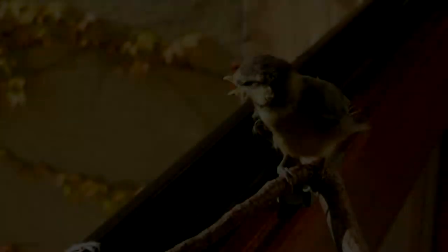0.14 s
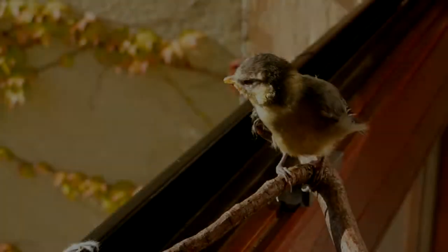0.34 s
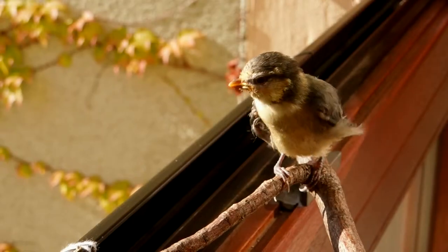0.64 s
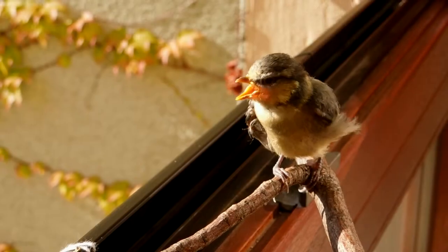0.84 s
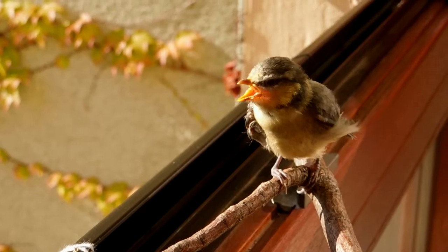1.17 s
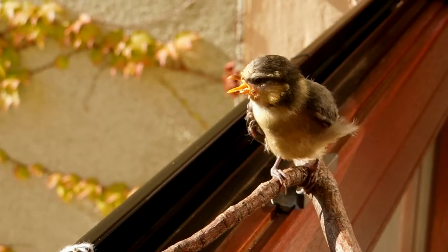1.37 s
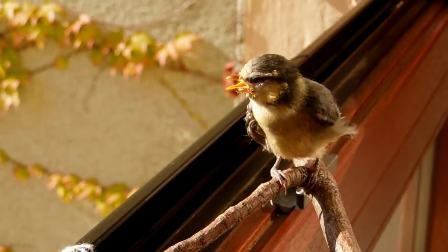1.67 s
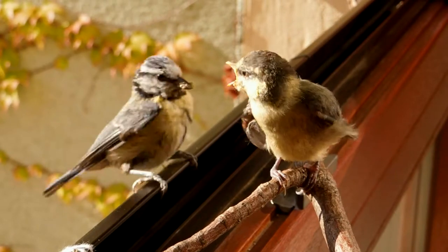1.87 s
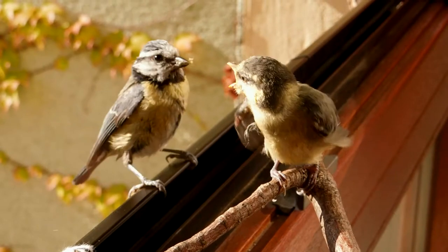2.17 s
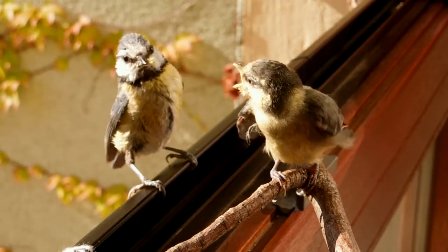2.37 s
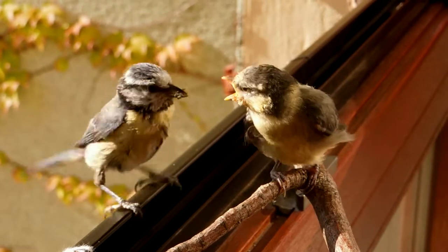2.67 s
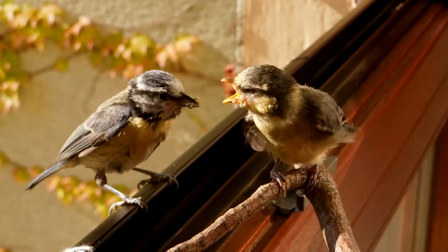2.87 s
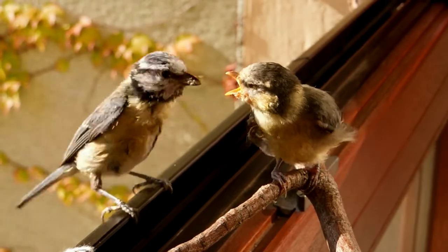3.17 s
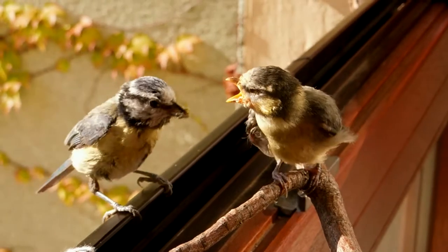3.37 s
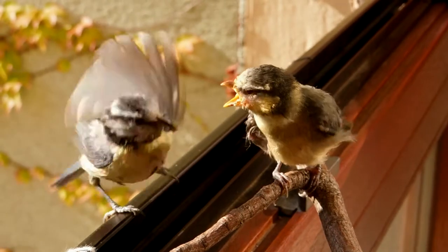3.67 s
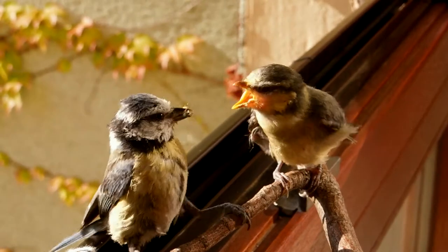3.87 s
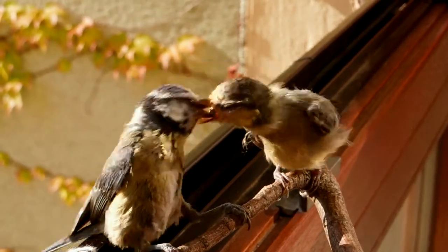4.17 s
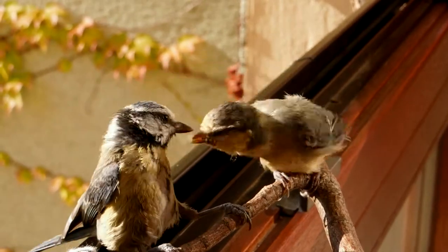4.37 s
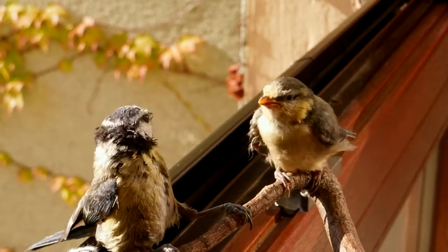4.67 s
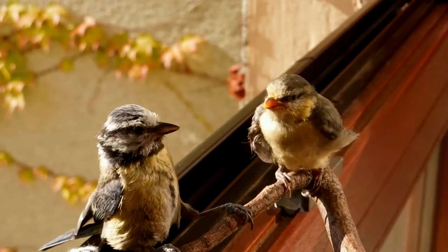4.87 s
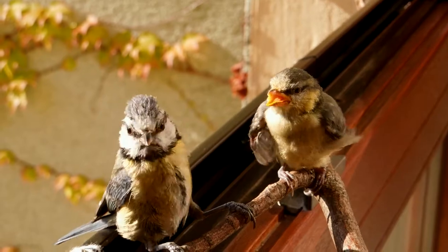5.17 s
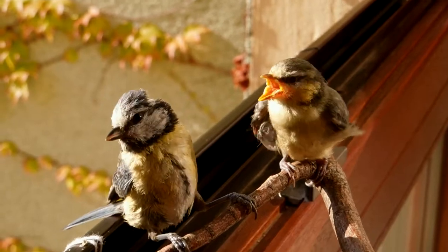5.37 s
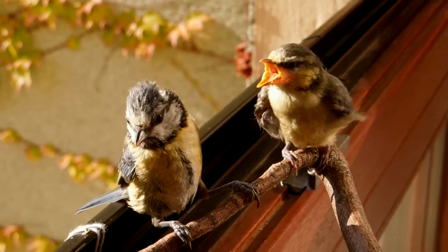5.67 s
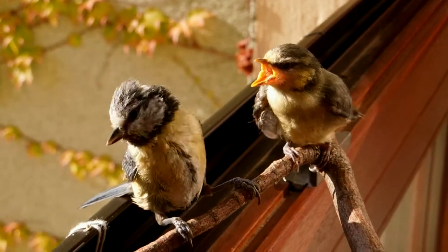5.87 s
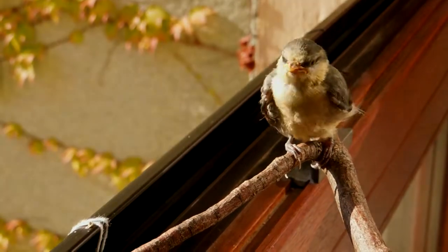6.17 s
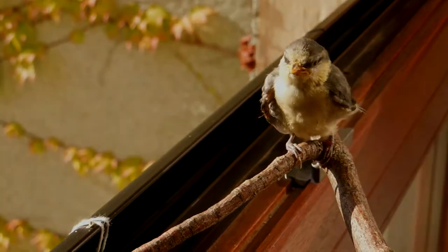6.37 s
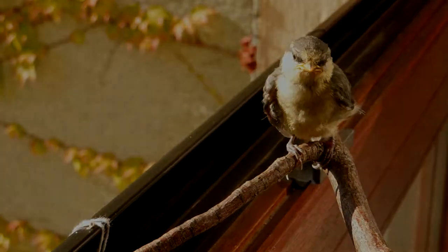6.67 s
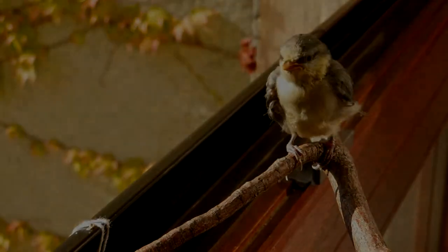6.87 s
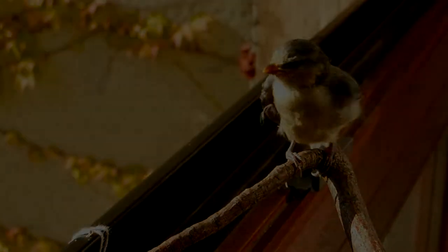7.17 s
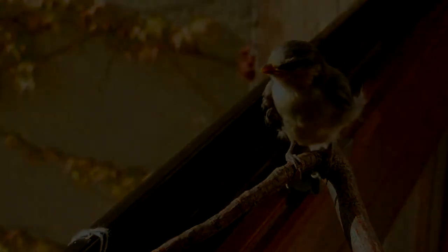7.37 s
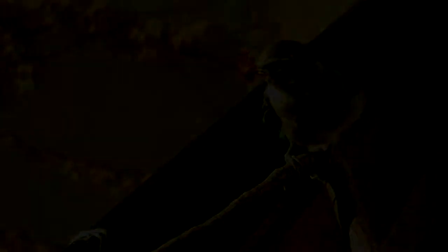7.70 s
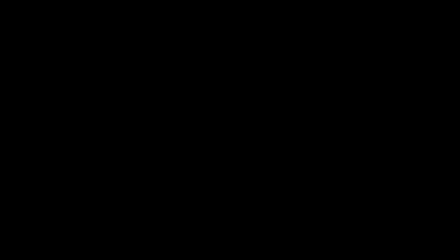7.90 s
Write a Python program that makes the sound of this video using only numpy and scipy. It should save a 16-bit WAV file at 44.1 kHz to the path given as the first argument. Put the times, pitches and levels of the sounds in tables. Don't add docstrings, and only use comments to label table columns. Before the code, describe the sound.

Bursts of raspy, very high chirps from a young bird outdoors, wing flaps and claw taps, faint peeps from another chick, soft traffic murmur behind.

```python
import sys
import numpy as np
from scipy import signal
from scipy.fft import rfft, irfft, next_fast_len
from scipy.io import wavfile
from scipy.ndimage import uniform_filter1d, map_coordinates

SR = 44100
rng = np.random.default_rng(int(sys.argv[2]) if len(sys.argv) > 2 else 0)


def to_wav(sig):
    pcm = np.clip(np.atleast_2d(sig), -1, 1) * 32767
    pcm = np.round(pcm).astype(np.int16)
    wavfile.write(sys.argv[1], SR, pcm.T)


def linear_from_db(decibels):
    return 10 ** (np.asarray(decibels, float) / 20)


N = 354563

# hz, density_db
RUMBLE_SPECTRUM = [(16, -32), (25, -5), (35, 6.5), (48, -4), (75, -2), (110, -8.5), (140, -9), (200, -5.5),
                   (300, -18.5), (600, -93.5)]
ROAD_SPECTRUM = [(88, -23), (150, -6.5), (315, -4.5), (456, -9), (531, -5), (584, -4.5), (1060, -3.5),
                 (1190, -7), (1530, -7), (2160, -12), (4000, -30), (5200, -50), (8800, -120)]
# time_s, level_db
TRAFFIC_SWELL = [(0, -0.5), (1, -0.5), (1.55, -4), (2.15, 1.5), (2.7, -3), (3.3, 1), (4.3, 0.7),
                 (5.5, -1.17), (6.4, -0.3), (6.9, -1.5), (7.6, -1)]
# hz, density_db
AIR_SPECTRUM = [(1470, -12), (2500, -4.5), (2820, -5), (3580, -6), (4860, -6.5), (5530, -9.5),
                (12700, -12.5), (14400, -21), (14800, -46), (15500, -60)]
# hz, likeness_0_to_1
STEREO_LIKENESS = [(60, 0.86), (150, 0.83), (380, 0.68), (950, 0.86), (2380, 0.66), (5980, 0.13),
                   (15000, 0.05)]
# time_s, peak_db
START_CLICKS = [
    (0.1493, -35.5),
    (0.16, -44),
]
# start_s, peak_db, gutter_ring_db, dull_knock_db
CLAW_TICKS = [(.38, -34, -23, -45), (.9862, -43, -38, -29.5), (2.0454, -23, -9, -29),
              (2.1504, -41.5, -26, -22), (2.9264, -33.5, -3.5, -34), (3.017, -34.5, 1.5, -22),
              (3.0455, -33.5, -4, -20), (3.255, -31, -9, -21), (5.338, -27, -35, -22),
              (6.0943, -29.5, -33, -32), (7.613, -38.5, -23, -15.5), (7.6484, -16, -34, -18)]
# hz, level_db, t60_s
GUTTER_MODES = [(2240, 1.5, 0.05), (2360, 4.5, 0.027)]
# start_s, length_s, top_hz, level_db, octave_db
PEEP_NOTES = [(.6, 0.065, 6740, -51, -45), (5.131, 0.049, 6160, -35.5, -30.5),
              (5.238, .069, 6000, -35.5, -30.5), (5.802, 0.053, 6320, -33, -32.5),
              (6.33, .06, 6000, -50, -45.5), (6.435, 0.053, 6023, -46.5, -45.5),
              (6.515, 0.053, 6300, -47.5, -45), (6.6, 0.053, 6020, -48, -48.5),
              (6.69, 0.066, 5600, -51, -52.5), (6.8, .068, 5590, -50, -55), (6.94, 0.064, 5530, -54, -58.5),
              (7.075, 0.075, 5530, -56.5, -57.5), (7.43, 0.093, 5940, -65.5, -67.5),
              (7.79, 0.057, 5800, -74, -75)]
# time_s, pitch_hz, level_db
ENGINE_TRACK = [(1.0, 67.1, -64.5), (1.61, 82.7, -63), (2.25, 77.4, -56.5), (3.36, 73.3, -55.5),
                (5.3, 62.5, -45.5), (5.65, 64.4, -42.5), (5.8, 76, -59.5), (6.04, 87.5, -60),
                (6.1, 85.1, -86)]
# start_s, length_s, throat_db,
# gape_over_throat_db, sizzle_over_throat_db
BREAKING_RASPS = [
    (.985, 0.055, -41.5, 7.5, -4),
    (1.097, 0.038, -45.5, 16.5, 4),
    (1.23, 0.042, -51, 15.5, 3),
    (2.306, 0.079, -29.5, 2.5, -4),
    (2.429, .045, -33.5, 8, -4.5),
    (2.55, 0.037, -34.5, 7, -3.5),
    (4.165, 0.075, -29, 2, -4),
    (4.291, 0.044, -34.5, 11.5, -1),
    (6.104, .056, -40, -5, 6),
    (6.233, .066, -30.5, -5, 4.5),
]
DYING_RASPS = [
    (1.4, 0.099, -39, 2.5, -10),
    (2.151, 0.11, -40.5, 1, -3),
    (2.69, .118, -31, 2, -10.5),
    (3.565, .06, -61.5, 13.5, -4),
    (4.043, 0.064, -34.5, 0, -3.5),
]
# hz, width_hz, level_db
THROAT_MODES = [(2220, 2300, -5), (3286, 1000, -1), (4700, 600, 5), (6000, 740, 1.5)]
GAPE_MODES = [(7370, 1300, 0)]
SIZZLE_MODES = [(10200, 1700, 3.5), (12160, 750, 7.5), (13660, 1800, 3.5)]
# start_s, length_s, upper_top_hz, upper_end_hz, level_db
WHISTLES = [
    (1.023, 0.029, 8830, 8450, -27),
    (1.11, 0.071, 8750, 8000, -20.5),
    (1.244, 0.099, 8280, 7310, -19),
    (2.363, 0.025, 7690, 7425, -16),
    (2.45, 0.06, 8140, 7470, -15),
    (2.57, .077, 7730, 7175, -14.5),
    (4.221, 0.022, 8010, 8070, -12.5),
    (4.31, 0.055, 7910, 7170, -14.5),
]
# times_upper_pitch, times_lower_pitch; then each one's level under_upper_db
MIXING_ORDERS = [(-1, 2), (2, -1), (0, 2), (1, 1), (2, 0)]
MIXING_LEVELS = [-33, -39, -34, -27, -31.5]
# start_s, length_s, hiss_db
WING_STROKES = [(1.354, 0.063, -51), (1.857, 0.058, -50.5), (1.919, 0.066, -44), (2.035, 0.054, -46),
                (2.9, .06, -53), (2.958, 0.079, -44), (3.016, 0.058, -51), (3.185, 0.053, -43.5),
                (3.231, 0.052, -39), (3.342, 0.047, -55.5), (3.446, 0.1, -42.5), (3.895, 0.11, -52.5),
                (3.994, 0.06, -46.5), (6.189, 0.044, -42), (6.298, 0.23, -50.5)]
# hz, density_db
FEATHER_SPECTRUM = [(1200, -61), (2500, -8.5), (5000, -12), (8000, -11.5), (10500, -5), (12700, -1),
                    (14400, -9), (15500, -44.5)]
# centre_s, half_length_s, level_db
LOW_THUMPS = [
    (2.88, .16, -43.5),
    (5.6, 0.21, -57),
    (6.27, 0.078, -42.5),
]
# time_s, level_db
SPARROW_TRACK = [
    (7.25, -68.5),
    (7.4, -62.5),
    (7.6, -63),
    (7.87, -70),
]
# hz, density_db
HEDGE_SPECTRUM = [(3300, -120), (3800, -14), (4300, -8), (4900, -11), (5400, -5), (6000, -28), (6600, -120)]
# time_s, wing_beat_hz, level_db
BEE_TRACK = [
    (7.3, 188, -78),
    (7.38, 190.4, -62),
    (7.48, 198, -61.5),
    (7.53, 204, -77),
]
BEE_HARMONICS = [3.5, 1.5, -1.5, 1, -13, -18, -2]
# delay_s, left_db, right_db
WALL_ECHOES = [(.0031, -5.5, -28), (.0083, -8.5, -14.5), (0.0109, -19.5, -35.5), (0.0227, -46.5, -55),
               (.034, -59, -33.5)]
# hz, t60_s
YARD_DECAY = [(300, 0.22), (4000, 0.15), (7500, 0.16), (13000, 0.14)]
# source_hz, lower_copy_db, upper_copy_db
GHOST_LEVELS = [(4000, -49.5, -52.5), (6800, -33, -37), (8000, -27, -32), (12000, -19, -33)]
# hz, level_db
MICROPHONE_RESPONSE = [(13500, 0.5), (14200, 2), (14700, -38.5), (15700, -37)]


def unit(x):
    return x / np.sqrt(np.mean(x ** 2) + 1e-20)


def along(points, hz):
    f, v = np.transpose(points)
    return np.interp(np.log(hz + 1), np.log(f + 1), v)


def curves(spans, edge=0.0055):
    t = np.arange(N) / SR
    gate = sum(np.clip(np.minimum(t - r[0][0], r[-1][0] - t) / edge + 1, 0, 1) for r in spans)
    s, *cols = np.concatenate(spans).T
    return [np.minimum(gate, 1)] + [np.interp(t, s, c) for c in cols]


def wobble(rate):
    knots = rng.standard_normal(int(N * rate / SR) + 4)
    return map_coordinates(knots, [np.arange(N) * rate / SR])


def turns(hz):
    return 2 * np.pi * np.cumsum(hz) / SR


def filtered(x, response):
    m = next_fast_len(N + 8192)
    return irfft(rfft(x, m) * response(np.fft.rfftfreq(m, 1 / SR)), m)[..., :N]


def resonant(x, peaks, waver_db):
    def band(centre, width):
        return filtered(x, lambda f: (1j * f * width / (centre ** 2 - f * f + 1j * f * width)) ** 2)
    return unit(sum(linear_from_db(db + waver_db * wobble(140)) * band(c, w) for c, w, db in peaks))


def rush(spectrum, patchy_db):
    z = signal.stft(rng.standard_normal((2, N)), nperseg=512)[2]
    field = uniform_filter1d(rng.standard_normal(z.shape[1:]), size=6, axis=0)
    field = uniform_filter1d(field, size=14, axis=1)
    pair = signal.istft(z * linear_from_db(patchy_db * unit(field)), nperseg=512)[1][:, :N]

    def response(hz):
        turn = np.arccos(np.clip(along(STEREO_LIKENESS, hz), -1, 1)) / 2
        return linear_from_db(along(spectrum, hz)) * [np.cos(turn), np.sin(turn)]
    mid, side = filtered(pair, response)
    return unit(np.array([mid + side, mid - side]))


def lay(events, shape, count):
    out = np.zeros((count, N))
    for s, length, *row in events:
        t = np.arange(round(length * SR)) / SR
        out[:, round(s * SR):][:, :len(t)] = shape(t, length, *row)
    return out


def background_fade():
    return np.interp(np.arange(N) / SR, [0.03, 2.31, 6.21, 8.19], [0, 1, 1, 0])


def traffic_swell():
    return background_fade() * linear_from_db(curves([TRAFFIC_SWELL])[1])


def traffic():
    rumble = background_fade() * linear_from_db(-49.5 + 0.72 * wobble(1.3)) * rush(RUMBLE_SPECTRUM, patchy_db=1.5)
    roar = traffic_swell() * linear_from_db(-47 + 0.65 * wobble(7.8)) * rush(ROAD_SPECTRUM, patchy_db=1.19)
    return rumble + roar


def air_hiss():
    return traffic_swell() ** 1.1 * linear_from_db(-54) * rush(AIR_SPECTRUM, patchy_db=2.0)


def start_clicks():
    t = np.arange(N) / SR

    def bump(s):
        return np.exp(-((t - s) / 8e-5) ** 2)
    return sum(linear_from_db(db) * (0.28 * bump(s + .0013) - bump(s)) for s, db in START_CLICKS)


def claw_ticks():
    out, t = np.zeros(N + SR), np.arange(SR // 8) / SR
    for s, db, ring_db, knock_db in CLAW_TICKS:
        noise = rng.standard_normal(len(t) + 1)
        decay = linear_from_db(-60 * t / .006) + .25 * linear_from_db(-60 * t / 0.02)
        crack = (noise[1:] - .7 * noise[:-1]) * decay
        dull = uniform_filter1d(noise[1:], size=5) - uniform_filter1d(noise[1:], size=24)
        knock = dull * linear_from_db(knock_db + 20.0 - 60 * t / 0.0096)
        ring = sum(linear_from_db(level - 60 * t / t60) * np.sin(2 * np.pi * hz * t) for hz, level, t60 in GUTTER_MODES)
        out[round(s * SR):][:len(t)] += linear_from_db(db - 4.0) * (crack + knock + linear_from_db(ring_db - 1.5) * ring)
    return out[:N]


def peep(t, length, top_hz, db, octave_db):
    u = t / length
    edge = np.clip(np.minimum(t, length - t) / .002, 0, 1)

    def hill(peak, rise_db, fall_db):
        return linear_from_db(-np.interp(u, [0, peak, 1], [np.sqrt(rise_db), 0, np.sqrt(fall_db)]) ** 2)
    soft_db, loud_db, end_hz = -56, -35, 4690
    effort = np.clip((db - soft_db) / (loud_db - soft_db), 0, 1)
    hold = effort * 0.011
    hz = top_hz - (top_hz - end_hz) * np.clip((t - hold) / (length - hold), 0, 1) ** 1.15
    hz = hz - effort * 347 * np.exp(-t / .004)
    hz = hz - 300.4 * u ** 6
    return hz, edge * linear_from_db(db) * hill(0.66, 14, 21), edge * linear_from_db(octave_db) * hill(0.39, 5.5, 29.5)


def peeps():
    hz, size, octave = lay(PEEP_NOTES, peep, count=3)
    phase = turns(hz + 70 * wobble(400))
    note = size * linear_from_db(5.0 + 4.9 * wobble(220)) * np.sin(phase)
    return np.sqrt(2) * (note + octave * linear_from_db(4 + 2.4 * wobble(220)) * np.sin(2 * phase))


def far_engine():
    gate, hz, db = curves([ENGINE_TRACK], edge=.2)
    return np.sqrt(2) * gate * linear_from_db(db + 1.5 * wobble(5.7)) * np.sin(turns(hz))


def rasps():
    t = np.arange(N) / SR
    effort, gape, sizzle = np.zeros((3, N))
    rate_hz = np.full(N, 1270.)
    calls = [(.72, *row) for row in BREAKING_RASPS] + [(.54, *row) for row in DYING_RASPS]
    for peak, s, length, db, gape_db, sizzle_db in calls:
        span = slice(round(s * SR), round((s + length) * SR))
        arch = np.sin(np.pi / 2 * np.interp(t[span] - s, [0, peak * length, length], [0, 1, 0]))
        snap = np.exp(-np.abs(t[span] - s) / 0.0019)
        effort[span] = linear_from_db(db) * (arch + .2 * snap)
        gape[span] = linear_from_db(gape_db) * (1 + 3.5 * snap)
        sizzle[span] = linear_from_db(sizzle_db)
        rate_hz[span] += 210 * arch ** 0.47
    phase = turns(rate_hz * (1 + 0.031 * wobble(120) + 0.077 * wobble(1300)))
    pulses = np.exp(12 * (np.cos(phase) - 1)) * linear_from_db(1.2 * wobble(700))
    sharp = unit(np.diff(pulses, 2, prepend=[0, 0]))
    source = linear_from_db(1.5 * wobble(300)) * (.85 * sharp + .5 * rng.standard_normal(N))
    throat = resonant(source, THROAT_MODES, 1.6)
    beak = gape * resonant(source, GAPE_MODES, 1.8)
    return effort * (throat + beak + sizzle * resonant(source, SIZZLE_MODES, 1.5))


def whistle(t, length, top_hz, end_hz, db):
    scoop_s = .016
    scoop = np.clip(1 - t / scoop_s, 0, 1) ** 1.5
    after = np.maximum(t - scoop_s, 0)
    sag_hz = (top_hz - end_hz) * (after / (length - scoop_s)) ** .85
    above_hz = top_hz - 8000
    attack_s, release_s = 0.015, 0.012
    swell = linear_from_db(db) * np.clip(np.minimum(t / attack_s, (length - t) / release_s), 0, 1) ** 0.69
    upper_hz = top_hz * (1 - 0.15 * scoop) - sag_hz
    lower_depth = 0.31 - 0.019 * above_hz / 100
    lower_hz = (6973 + .55 * above_hz) * (1 - lower_depth * scoop) - .75 * sag_hz
    lower_db = 0.45 * above_hz / 100 - 119.5 * after
    return upper_hz, swell, lower_hz, swell * linear_from_db(lower_db)


def duet():
    up_hz, up_size, low_hz, low_size = lay(WHISTLES, whistle, count=4)

    def beak(hz):
        return linear_from_db(-5 * ((hz - 7930) / 1105) ** 2)
    up_size, low_size = up_size * beak(up_hz), low_size * beak(low_hz)
    up = turns(up_hz + 40 * wobble(320))
    low = turns(low_hz + 40 * wobble(300))
    upper = up_size * linear_from_db(2.3 * wobble(210)) * np.sin(up)
    lower = low_size * linear_from_db(2.5 * wobble(110)) * np.sin(low)
    mixed = sum(linear_from_db(db + 8.7 * wobble(50)) * np.sin(a * up + b * low)
                for (a, b), db in zip(MIXING_ORDERS, MIXING_LEVELS))
    return np.sqrt(2) * (upper + lower + up_size * mixed)


def wings():
    swish = np.zeros(N)
    for s, length, db in WING_STROKES:
        stroke = np.sin(np.linspace(0, np.pi, round(length * SR))) ** .6
        swish[round(s * SR):][:len(stroke)] += linear_from_db(db) * stroke
    return swish * linear_from_db(2 * wobble(250)) * rush(FEATHER_SPECTRUM, patchy_db=2.5)


def low_thumps():
    t = np.arange(N) / SR
    puffs = sum(linear_from_db(db) * np.exp(-((t - s) / half) ** 4) for s, half, db in LOW_THUMPS)
    return puffs * np.sin(turns(35 + 5 * wobble(25)))


def sparrows():
    gate, db = curves([SPARROW_TRACK], edge=0.09)
    return gate * linear_from_db(db + 1.5 * wobble(30)) * rush(HEDGE_SPECTRUM, patchy_db=1.5)


def bee():
    gate, hz, db = curves([BEE_TRACK])
    phase = turns(hz)
    return gate * linear_from_db(db) * sum(linear_from_db(tone) * np.sin((k + 1) * phase) for k, tone in enumerate(BEE_HARMONICS))


def yard(x):
    hz, t, z = signal.stft(rng.standard_normal((2, SR // 3)), SR, nperseg=256)
    tail = signal.istft(z * linear_from_db(-60 * t / along(YARD_DECAY, hz)[:, None]), SR, nperseg=256)[1]
    answer = linear_from_db(-13.0) * np.pad(tail / np.linalg.norm(tail[0]), ((0, 0), (200, 0)))
    for delay, left_db, right_db in WALL_ECHOES:
        answer[[0, 1], round(delay * SR) + np.array([0, 3])] += linear_from_db([left_db, right_db])
    return signal.fftconvolve(x[None], answer, axes=1)[:, :N]


def ghosts(x):
    hz, lower_db, upper_db = np.transpose(GHOST_LEVELS)
    spin = np.exp(1j * turns(np.full(N, 48000 - 44100)))

    def one_sided(db):
        part = filtered(x, lambda f: linear_from_db(np.interp(f, hz, db)))
        return signal.hilbert(part, next_fast_len(N))[:, :N]
    return (one_sided(lower_db) / spin + one_sided(upper_db) * spin).real


def scene():
    claws, sibling, begging = claw_ticks(), peeps(), rasps() + duet()

    def lag(hz):
        return np.exp(-1j * np.pi * hz * np.array([[1.6e-5], [-1.6e-5]]))
    near = begging + linear_from_db(-1) * sibling + claws
    direct = linear_from_db([[-2], [.9]]) * filtered(near[None], lag)
    echoes = yard(begging + linear_from_db(-0.5) * sibling + linear_from_db(-9.0) * claws)
    far = traffic() + air_hiss() + start_clicks() + far_engine() + low_thumps() + sparrows() + bee()
    return direct + echoes + wings() + linear_from_db([[-.5], [.5]]) * far


def roll_off(x):
    return signal.sosfilt(signal.butter(12, 15660, fs=SR, output="sos"), x)


def record(dry):
    t = np.arange(N) / SR
    heard = filtered(dry + ghosts(dry), lambda hz: linear_from_db(along(MICROPHONE_RESPONSE, hz)))
    open_s, shut_s = .146, 7.868
    shot = np.clip(np.minimum(t - open_s, shut_s - t) / 0.0026, 0, 1)
    return roll_off(heard * shot)


dry = scene()
out = record(dry)
to_wav(out)
```